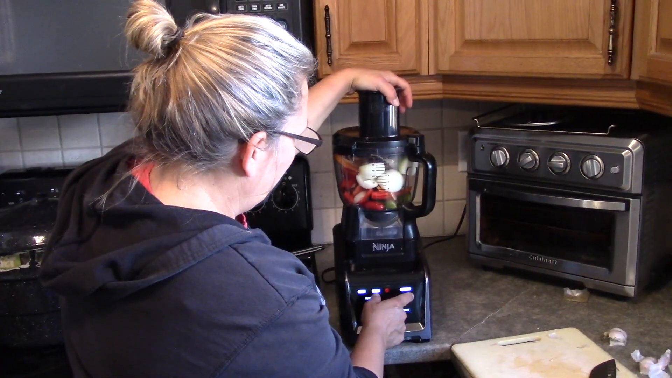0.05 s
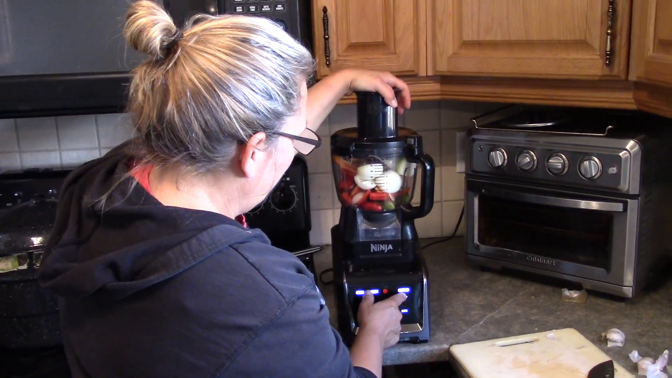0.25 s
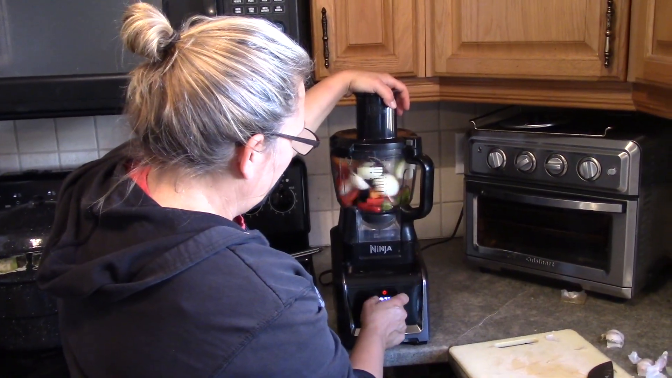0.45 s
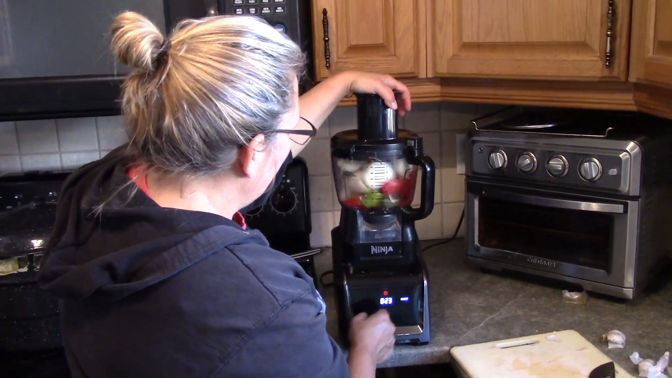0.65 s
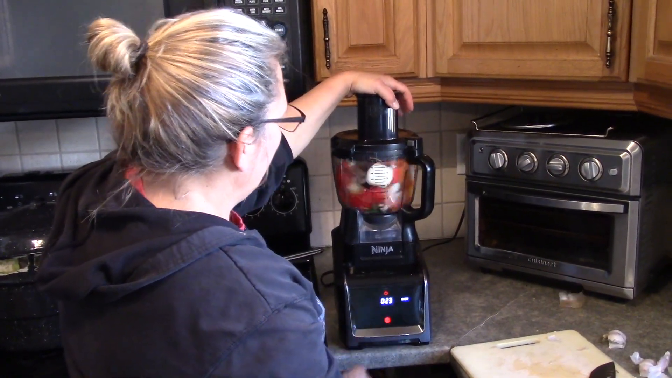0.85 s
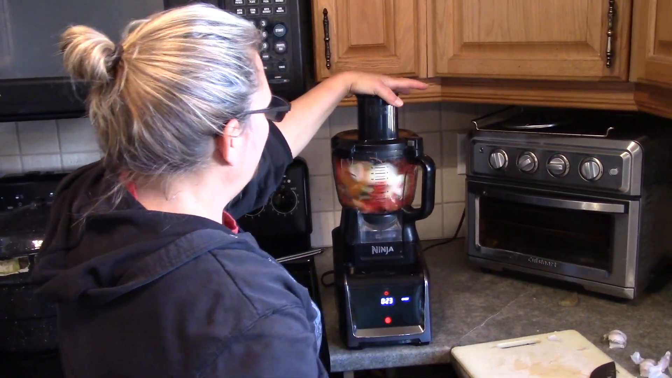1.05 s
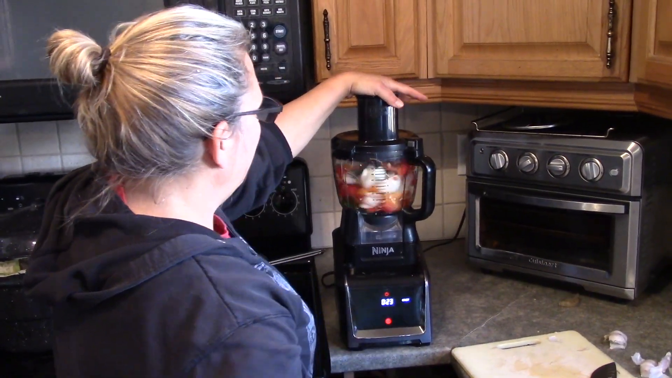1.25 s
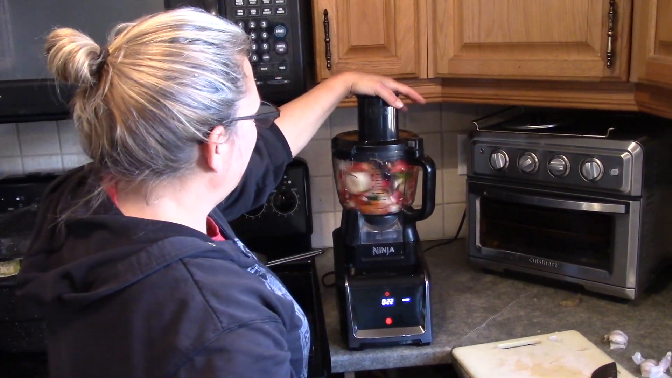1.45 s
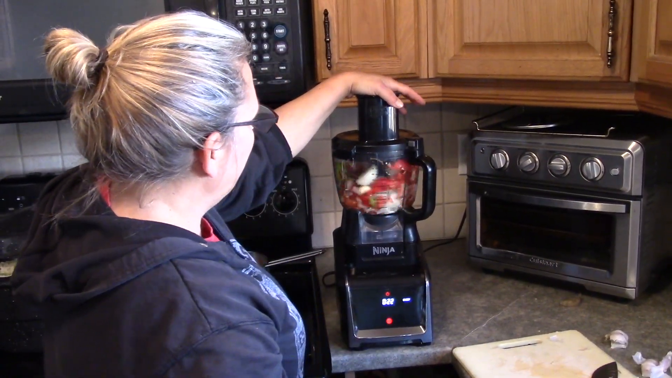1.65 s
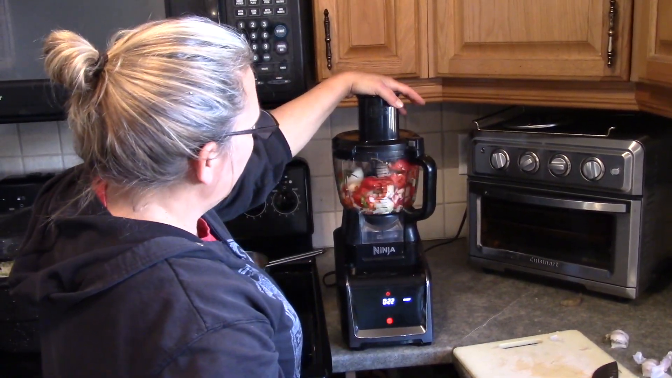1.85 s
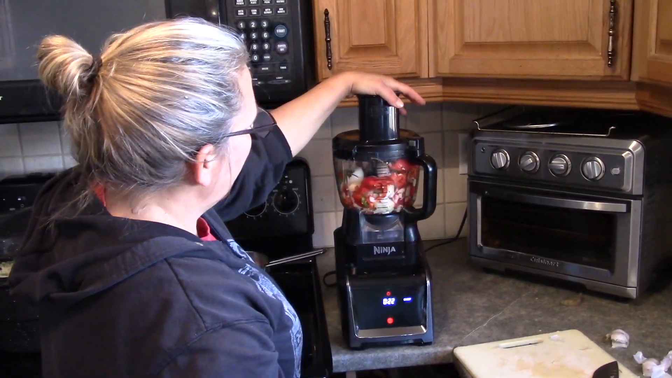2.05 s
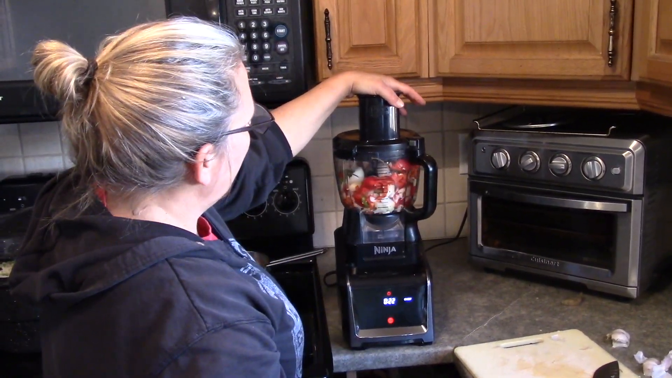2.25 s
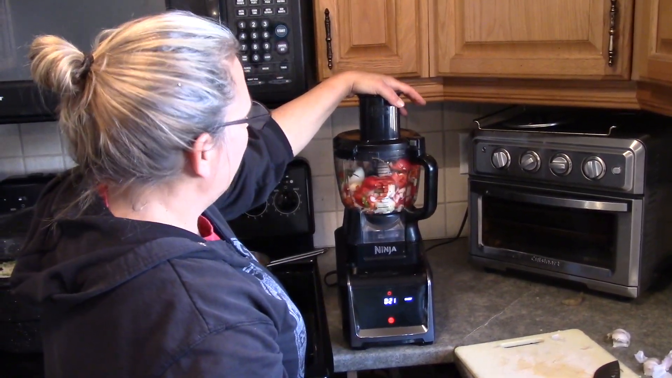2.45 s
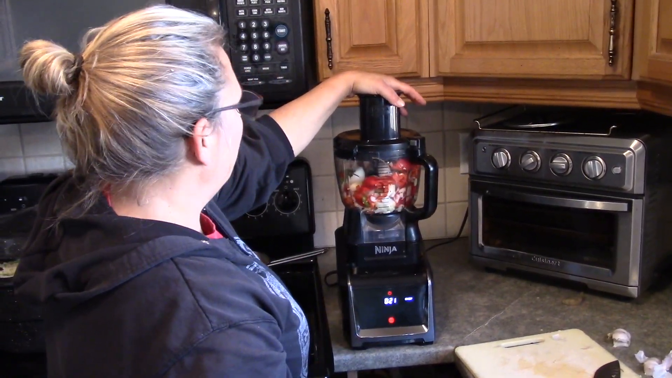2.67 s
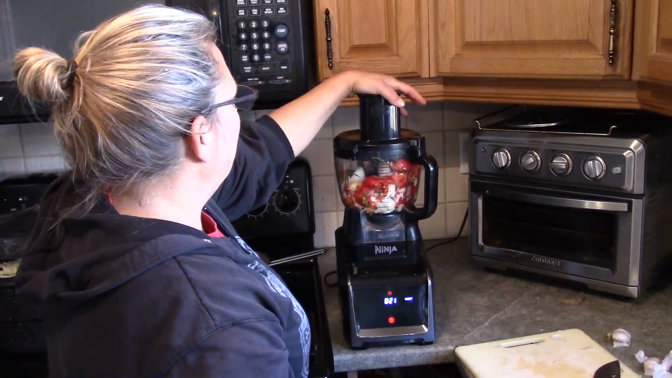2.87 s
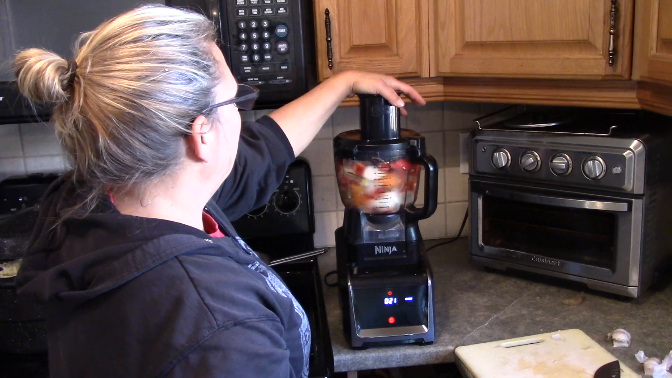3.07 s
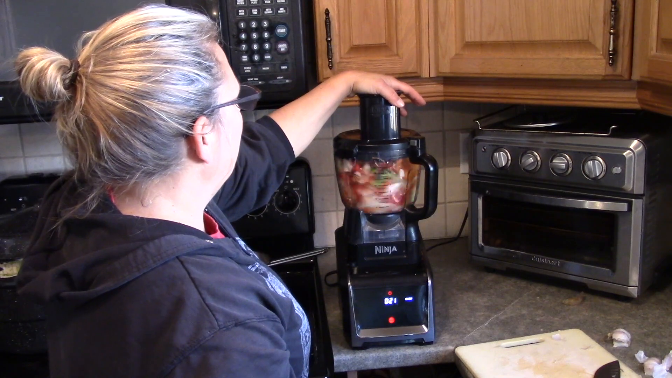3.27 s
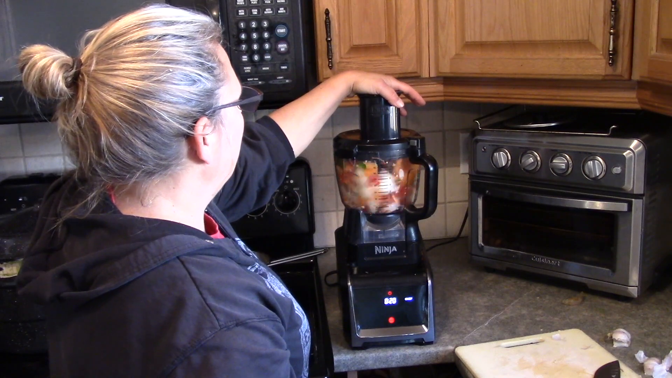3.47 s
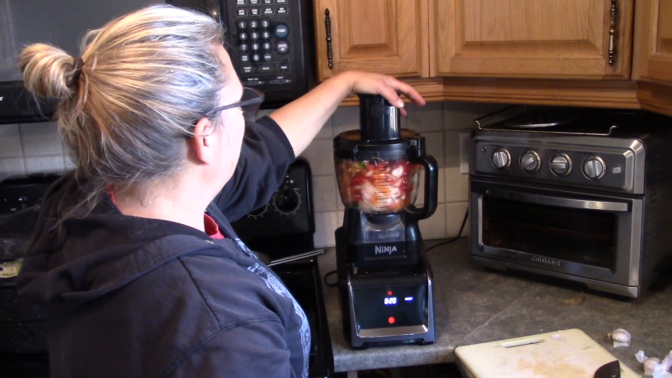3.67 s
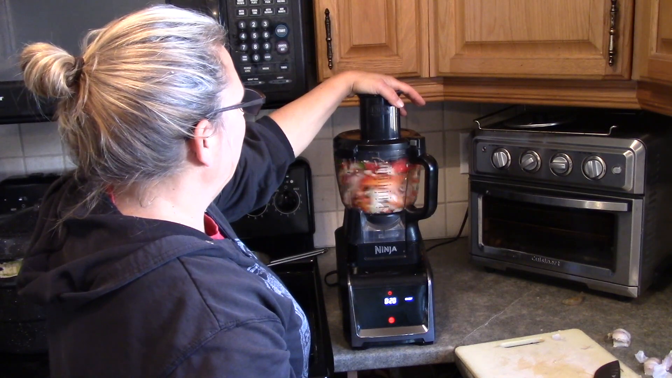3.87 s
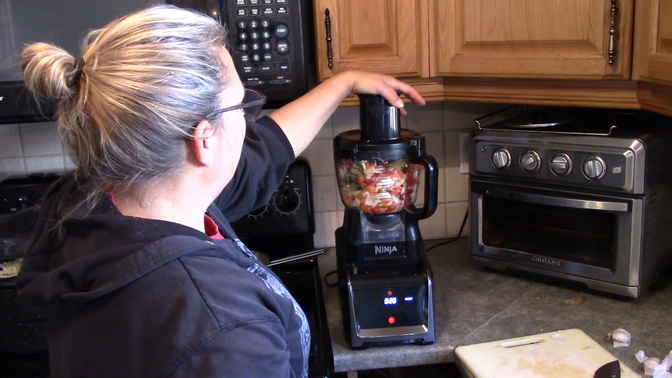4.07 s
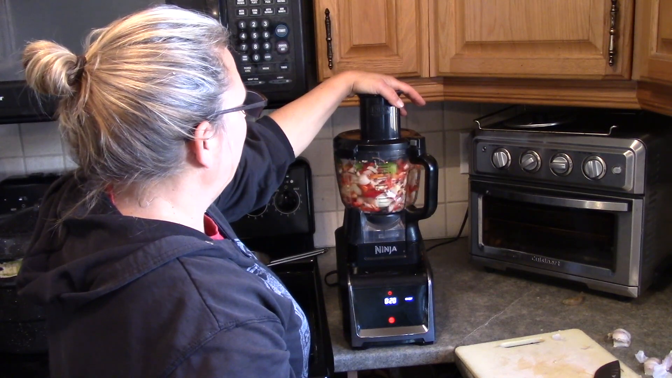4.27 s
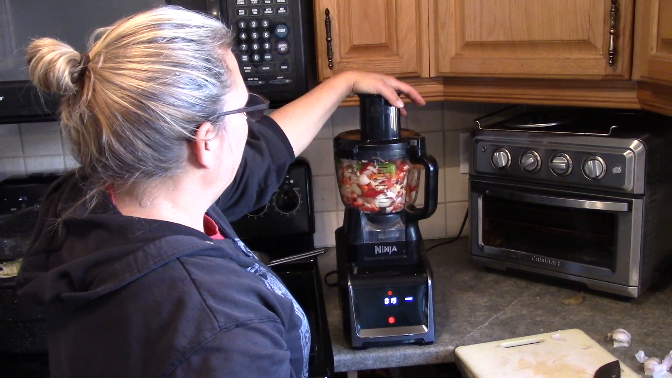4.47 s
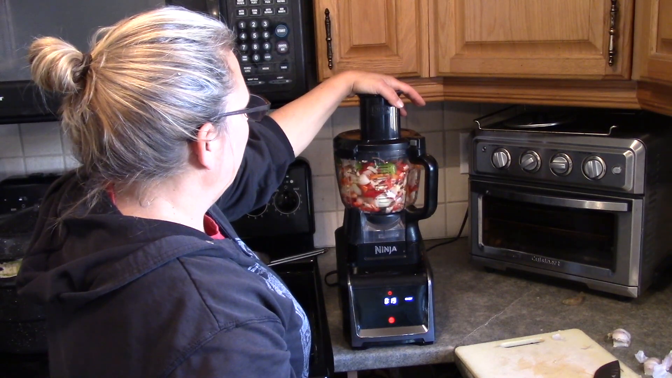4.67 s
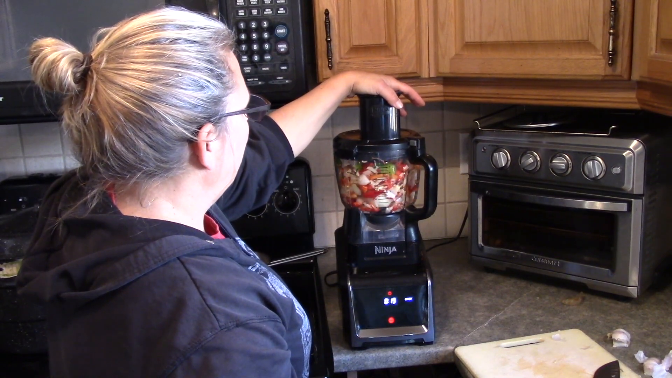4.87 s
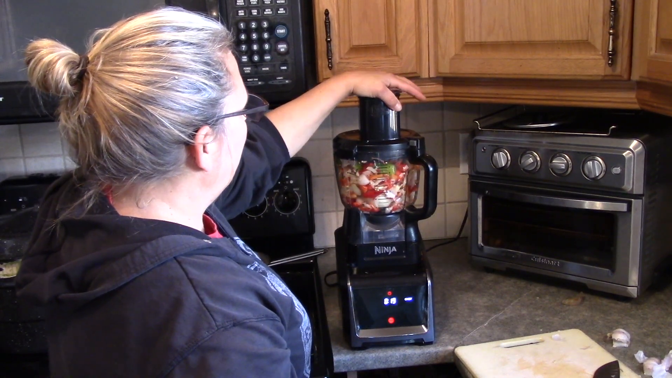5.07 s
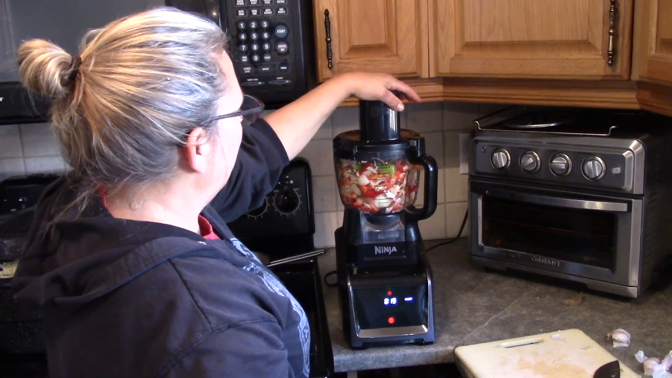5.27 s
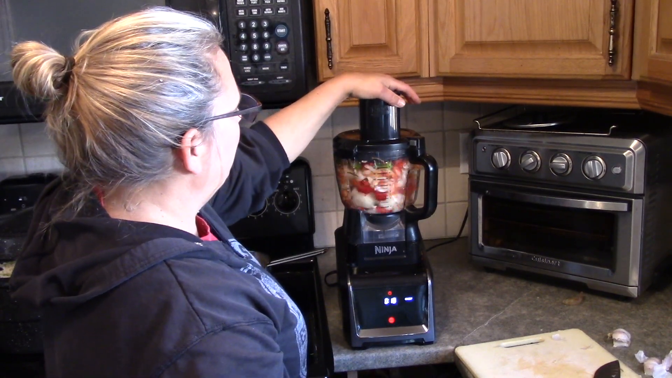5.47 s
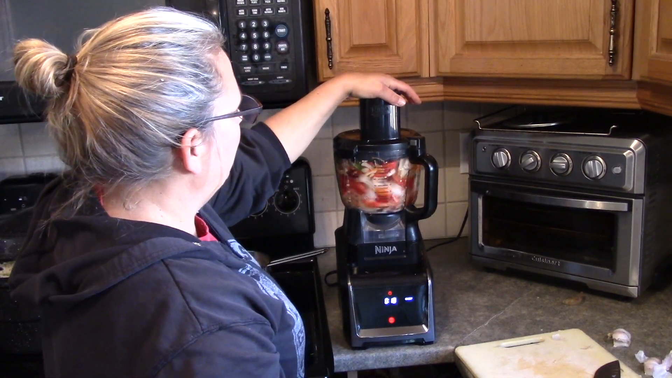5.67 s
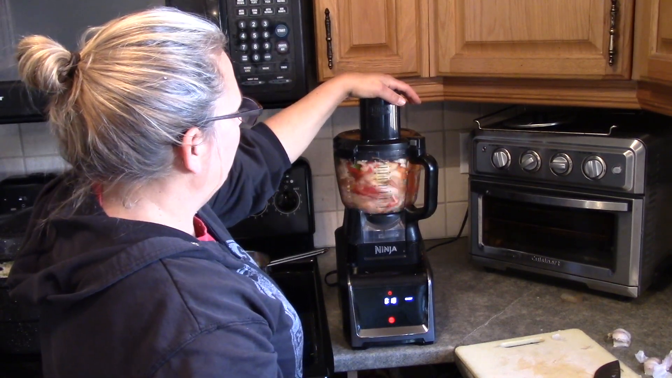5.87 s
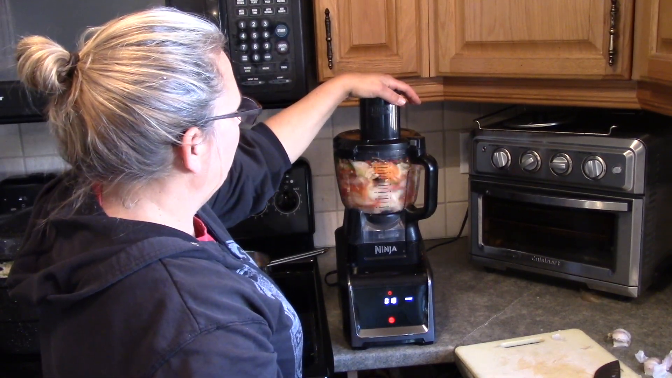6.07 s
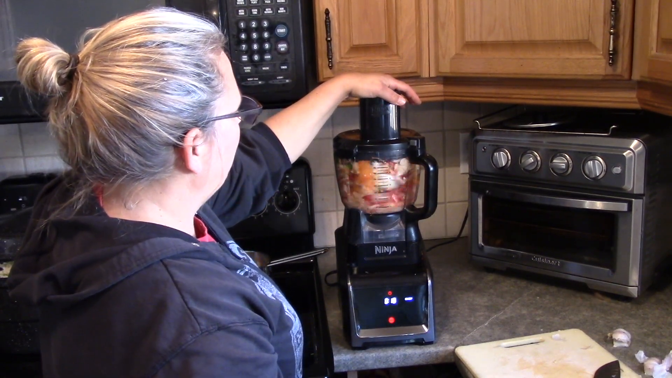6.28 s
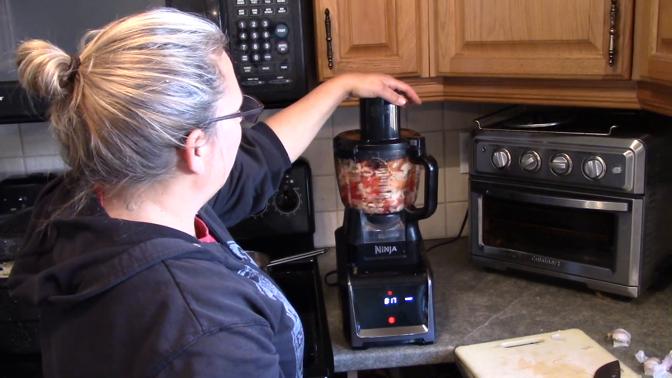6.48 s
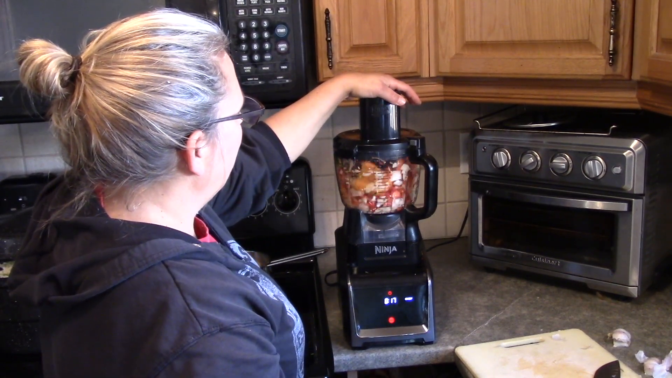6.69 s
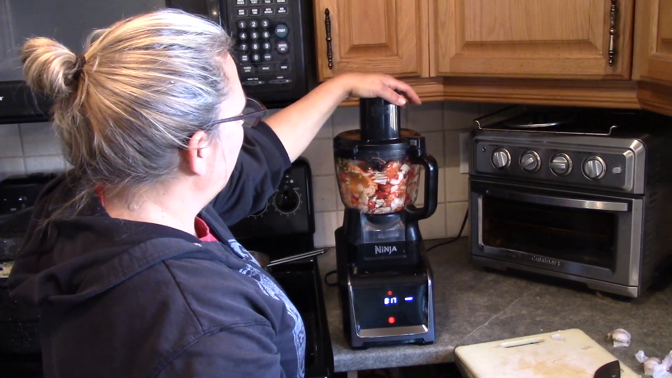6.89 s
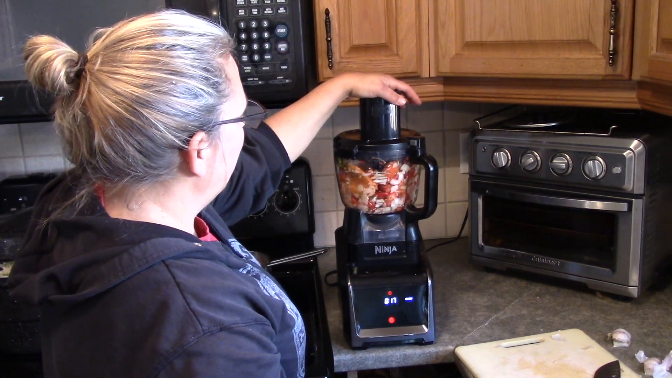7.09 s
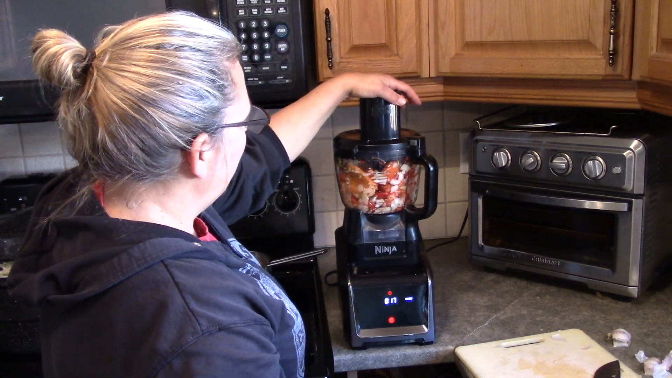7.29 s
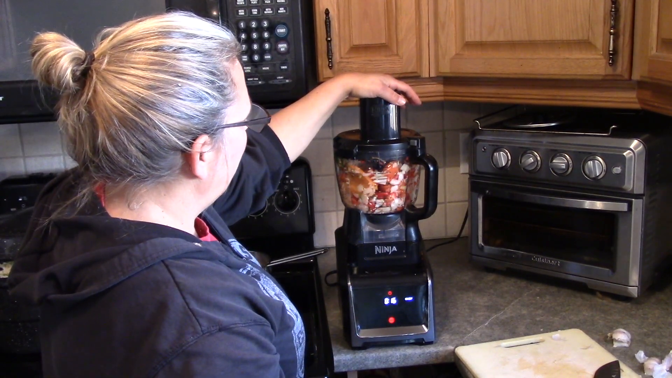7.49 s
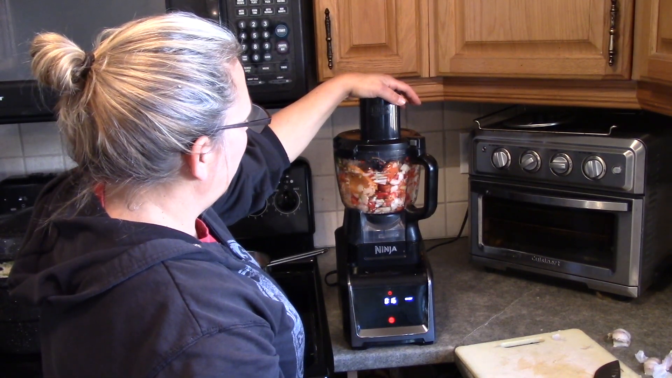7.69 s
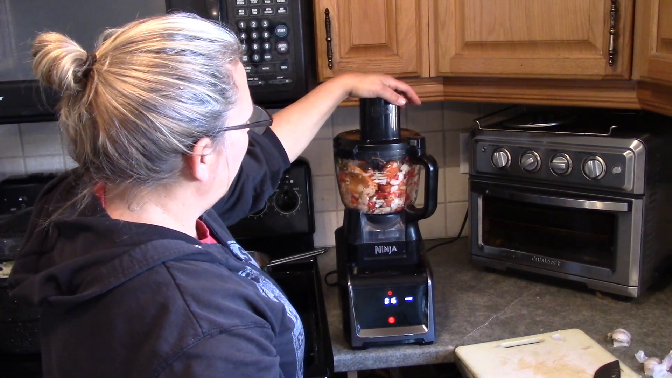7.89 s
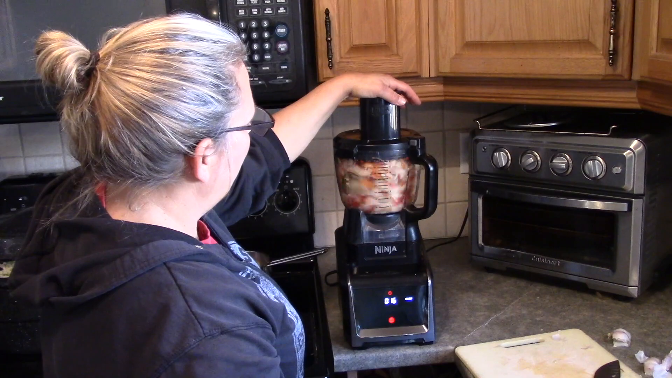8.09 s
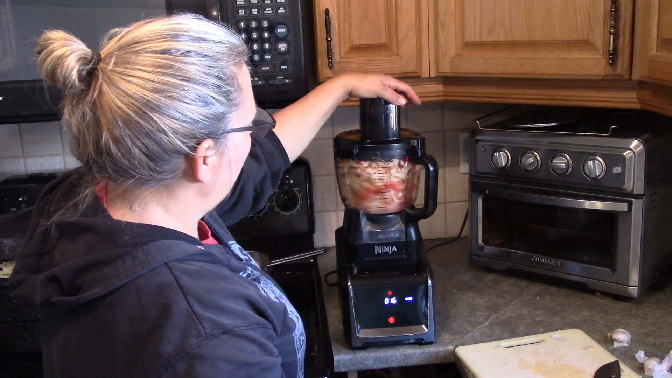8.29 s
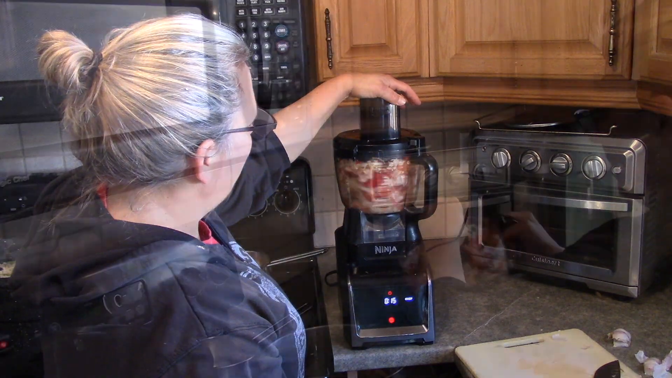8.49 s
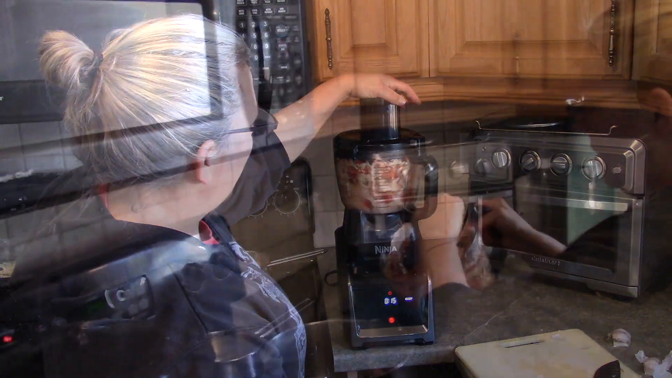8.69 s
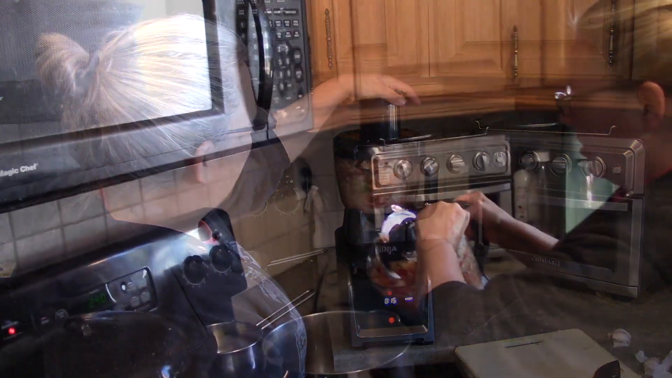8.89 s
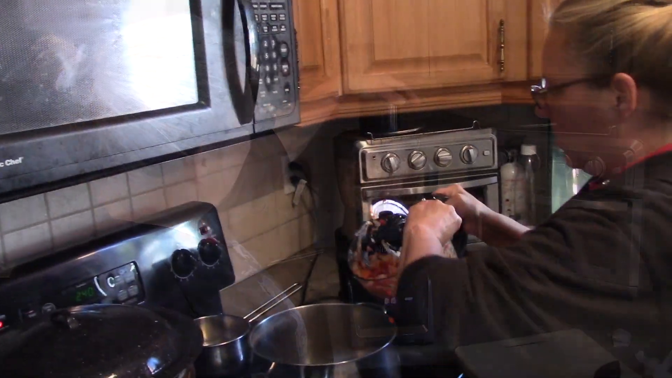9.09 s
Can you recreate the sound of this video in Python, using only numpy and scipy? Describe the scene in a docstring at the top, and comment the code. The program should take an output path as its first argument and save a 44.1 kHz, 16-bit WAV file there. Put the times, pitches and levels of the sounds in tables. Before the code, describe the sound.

A food processor chops vegetables in four loud, rattling, whirring bursts, each spinning up and winding down, with faint ticks between.

```python
"""Four whirring, rattling bursts: a food processor chops vegetables on a kitchen counter.
Each pulse opens with a snap of the blade; the motor spins up, then coasts down under drag and friction.
Its gears whine at their mesh frequency while flying pieces excite the resonances of the plastic bowl.
Relays tick and the housing knocks in the pauses, over steady air noise and a faint hum.
Gain control holds the bursts down, and the last one is faded out."""
import sys
import numpy as np
from scipy import signal
from scipy.fft import rfft, irfft
from scipy.io import wavfile
from scipy.ndimage import uniform_filter1d, map_coordinates

SR = 44100
rng = np.random.default_rng(int(sys.argv[2]) if len(sys.argv) > 2 else 0)


def unload_wav(signal):
    """Save mono or channel-first audio to the path in sys.argv[1] as 16-bit WAV at rate SR, clipped to [-1, 1]."""
    wavfile.write(
        sys.argv[1],
        SR,
        np.round(np.clip(np.atleast_2d(signal).T, -1, 1) * 32767).astype(np.int16),
    )


N = 403377
TIME = np.arange(N) / SR
POWER_S = .525  # the motor is driven this long in every pulse


def undb(db):
    """Decibels to amplitude ratio."""
    return 10 ** (np.asarray(db) / 20)


def unit(x):
    """Normalisation to rms 1."""
    return x / np.sqrt(np.mean(x ** 2))


def cut(x, hz, kind, order=2):
    """Butterworth filter."""
    return signal.sosfilt(signal.butter(order, hz, kind, fs=SR, output="sos"), x)


def add(out, start_s, x):
    """Superposition: mix x into out from start_s on."""
    i = int(start_s * SR)
    out[i:i + len(x)] += x[:len(out) - i]


def walk(rate_hz, size):
    """Smooth random modulation of rms 1, changing about rate_hz times a second."""
    points = rng.standard_normal(4096)
    return unit(map_coordinates(points, [np.arange(size) * rate_hz / SR], order=2, mode="wrap"))


def colour(x, spectrum, resonances=(), size=8192):
    """Minimum-phase filter: a smooth spectral envelope with bell-shaped peaks and dips."""
    bin_hz = np.arange(size // 2 + 1) * SR / size
    hz, db = np.transpose(spectrum)
    db = np.interp(np.log(bin_hz + 1), np.log(hz), db)
    for centre_hz, width_hz, lift_db in resonances:
        db = db + lift_db / (1 + (2 * (bin_hz - centre_hz) / width_hz) ** 2)
    cepstrum = irfft(np.log(undb(db)))
    cepstrum[1:size // 2] *= 2  # folding the cepstrum makes the response causal
    cepstrum[size // 2 + 1:] = 0
    response = irfft(np.exp(rfft(cepstrum)))
    return signal.fftconvolve(x, response)[:len(x)]


def burst(t60_s, size=16384):
    """Exponential decay of noise: the raw sound of a small blow."""
    return rng.standard_normal(size) * np.exp(-np.log(1000) * TIME[:size] / t60_s)


def scatter(hits, wet_db, t60_s):
    """Diffuse scattering: each hit lands somewhere else, so each has its own tail of echoes."""
    retention = np.exp(-2 * np.log(1000) / (t60_s * SR))
    power = signal.lfilter([1 - retention], [1, -retention], hits ** 2)
    return hits + undb(wet_db) * np.sqrt(power) * rng.standard_normal(len(hits))


def impacts(per_s, spread_db):
    """Poisson process: random hits of uneven strength, their power independent of their rate."""
    struck = rng.random(len(per_s)) < per_s / SR
    strength = undb(spread_db * np.clip(rng.standard_normal(len(per_s)), -2, 2))
    sign = rng.choice([-1, 1], len(per_s))
    return unit(struck * sign * strength / np.sqrt(per_s))


def kitchen():
    """Broadband air noise and an appliance hum that wavers by amplitude and phase modulation."""
    # spectrum of the air noise: frequency_hz, gain_db
    air_spectrum = [(18, -71), (30, -62), (65, -18), (143, -12), (195, -1.5), (296, -5.5), (320, -8.5),
                    (374, -3), (415, -9), (497, -5.5), (538, -9), (905, -14), (1520, -12), (2990, -14),
                    (9000, -34), (15000, -50.5)]
    # partials of the hum: pitch_hz, level_db
    hum_partials = [(205, -54.5), (500, -55)]
    air = unit(colour(rng.standard_normal(N), air_spectrum)) * undb(-39.5 + .63 * walk(15, N))
    hum = np.zeros(N)
    for pitch_hz, level_db in hum_partials:
        amplitude = undb(level_db + 5 * walk(16, N))
        hum += amplitude * np.sin(2 * np.pi * pitch_hz * TIME + 1.2 * walk(25, N))
    return air + hum


def relay_ticks():
    """Impulse excitation: relays and latch give bright ticks with a thin metallic resonance."""
    # relay and latch ticks: start_s, relative_peak_db
    ticks = [(0.0944, -46), (1.7833, -45), (4.3006, -34), (4.3321, -29), (6.8922, -34)]
    # spectrum of a tick: frequency_hz, gain_db
    tick_spectrum = [(500, -32), (3000, -24), (6000, 5), (9000, 12), (11000, 2), (15500, -36)]
    out = np.zeros(N)
    for start_s, relative_peak_db in ticks:
        blow = scatter(burst(t60_s=.022), wet_db=-4, t60_s=.14)
        tick = colour(blow, tick_spectrum, resonances=[(6400, 60, 17)])
        add(out, start_s, tick / np.abs(tick).max() * undb(relative_peak_db + 3))
    return out


def motor(t, coast_s):
    """Mesh frequency and torque (0-1): a first-order spin-up, then braking by drag and dry friction."""
    kick_hz, free_hz, time_constant_s = 222, 859.5, .158
    drag = .75  # drag of the food against dry friction: bends the coast-down, straight near 0
    shortfall = np.exp(-np.minimum(t, POWER_S) / time_constant_s)
    driven_hz = free_hz - (free_hz - kick_hz) * shortfall
    coast_left = np.clip(1 - (t - POWER_S) / coast_s, 0, 1)
    return driven_hz * np.tan(drag * coast_left) / np.tan(drag), shortfall * (t < POWER_S)


def reflect(x):
    """Comb filtering: early reflections from hard surfaces interfere with the direct sound."""
    # echoes off counter, tiles and cupboards: delay_ms, gain_db
    echoes = [(1.7, -20), (3.7, -19), (6.1, -19), (10.3, -17)]
    return x + sum(undb(db) * np.pad(x, (int(ms * SR / 1000), 0))[:len(x)] for ms, db in echoes)


def rattle(speed, mesh_phase, crack_db):
    """Impact noise: loose gear teeth and flying pieces excite the bowl's modes, more often at speed."""
    # spectrum of one hit on bowl and base: frequency_hz, gain_db
    bowl_spectrum = [(30, -41), (70, -26), (130, -18.5), (220, -9), (450, 1.5), (1100, 4.5), (1850, -1.5),
                     (2600, -3), (3800, -12), (5300, -14), (7000, -20.5), (9300, -21.5), (11000, -33.5),
                     (15500, -44.5)]
    # resonances of bowl, lid and base: centre_hz, width_hz, lift_db
    bowl_modes = [(214, 78, 4.5), (493, 56, 9.5), (588, 61, 5.5), (738, 48, 8), (1017, 13, 2),
                  (1363, 110, 7), (1514, 24, 9), (1965, 60, 4), (2287, 74, 6), (2657, 160, 4),
                  (2880, 29, -0.5), (3600, 22, 4.5), (4355, 59, 1.5)]
    size = len(speed)
    teeth = impacts(per_s=220 + 1900 * speed, spread_db=3.4) * (1 + .5 * np.cos(mesh_phase))
    pulp = undb(-4) * rng.standard_normal(size)  # wet pulp slides round the wall
    # slow blades shove the pieces round in clumps
    clumps = 1 + .7 * (1 - speed) ** 2 * np.cos(mesh_phase / 9 + walk(15, size))
    hits = (teeth + pulp) * clumps * undb(walk(70.83, size))
    bowl = unit(colour(scatter(hits, wet_db=2, t60_s=.53), bowl_spectrum, bowl_modes))
    body = cut(bowl, 1560, "lowpass", order=4)
    crack = reflect(cut(bowl, 1910, "highpass", order=4))
    rocking = cut(body, 263, "lowpass", order=1) * 3.75 * (1 - speed)  # slow, heavy blows rock the base
    spray = cut(crack, 6000, "highpass", order=1) * .031 * speed  # thrown by fast cuts
    return undb(2.5) * unit(body + rocking) + undb(crack_db) * unit(crack + spray)


def gear_whine(speed, mesh_phase):
    """A tone at the tooth-meshing rate, modulated by each turn and each piece the blades meet."""
    # radiation of the housing: frequency_hz, gain_db
    housing_spectrum = [(40, -40), (85, -8), (170, -7.5), (240, -3), (3000, 2)]
    # resonances and dips of the housing: centre_hz, width_hz, lift_db
    housing_modes = [(236, 49, 10), (388, 296, -10), (503, 75, 17), (711, 163, 9.5), (796, 23, -3)]
    size, teeth_per_turn = len(speed), 21.5
    jitter = (.3 + 1.2 * (1 - speed) ** 2) * walk(80, size)  # slack gears make the tone ragged
    phase = mesh_phase + jitter
    overtones = undb(-19) * np.sin(2 * phase) + undb(-14) * np.sin(3 * phase + walk(90, size))
    throb = 1 + .37 * np.cos(mesh_phase / teeth_per_turn + walk(7.84, size))
    tone = unit((np.sin(phase) + overtones) * throb * undb(1.33 * walk(58.8, size)))
    return colour(tone, housing_spectrum, housing_modes)


def blade_snap(ring_db):
    """Backlash: at switch-on the blade slaps against its drive and rings briefly."""
    # spectrum of the slap: frequency_hz, gain_db
    slap_spectrum = [(100, -25), (500, -13.5), (2500, 5), (4000, -7), (9000, -15), (11000, -26),
                     (15500, -35)]
    slap = colour(burst(t60_s=.11), slap_spectrum, resonances=[(5550, 150, ring_db)])
    return slap / np.abs(slap).max()


def chunks(t, speed):
    """Resonance: big pieces thump the wall and sound the bowl's hollow note."""
    note_hz, width_hz = 1380, 123
    bite_s = .049  # the blades need this long to get the pieces flying
    blows = impacts(per_s=180 * (.25 + speed), spread_db=2)
    note = unit(cut(blows, [note_hz - width_hz / 2, note_hz + width_hz / 2], "bandpass"))
    return note * np.sqrt(speed) * np.minimum(t / bite_s, 1) ** 2


def shaft_hum(speed, mesh_phase):
    """Rotating unbalance: a tone at the motor's turning rate that grows steeply with speed."""
    shaft_phase = .288 * mesh_phase
    return np.sin(shaft_phase) * speed ** 4 * undb(-6 + 1.3 * walk(25.3, len(speed)))


def pulse(coast_s, coast_db):
    """Forced vibration: speed and torque govern every source through one spin-up and coast-down."""
    base_hz, base_width_hz = 231, 57
    attack_s, stall_speed = .044, .17  # below this share of top speed the pieces stop flying
    t = TIME[:int(1.7 * SR)]
    mesh_hz, torque = motor(t, coast_s)
    speed, coasting = mesh_hz / mesh_hz.max(), t > POWER_S
    mesh_phase = 2 * np.pi * np.cumsum(mesh_hz) / SR
    # coasting through the base's resonance shakes the bowl
    shudder = coasting / (1 + (2 * (mesh_hz - base_hz) / base_width_hz) ** 2)
    settled = coasting * np.minimum((1 - speed) * 4, 1)  # the food drops back onto the slowing blades
    # slower hits are softer; food scrapes the shuddering wall
    crack_db = 3 + 6 * np.log2(speed + 1e-6) + 2.5 * shudder
    shaft = shaft_hum(speed, mesh_phase)
    hits = rattle(speed, mesh_phase, crack_db)
    thumps = chunks(t, speed) * undb(-6.5 + 15.5 * torque)
    gears = gear_whine(speed, mesh_phase) * undb(-1.5 - 8 * torque)  # torque presses the teeth together
    flying = speed ** 2 / (speed ** 2 + stall_speed ** 2)
    force = np.minimum(t / attack_s, 1) ** .8 * speed ** .73 * flying
    gain_db = -9.5 + 11 * torque + coast_db * settled + 2.5 * shudder
    return (hits + thumps + gears + shaft) * force * undb(gain_db)


def room(x):
    """Short, dull reverberation: the gliding whine swells and dips as it crosses the room's modes."""
    tail = burst(t60_s=.32)
    tail *= np.minimum(TIME[:len(tail)] / .01, 1)
    tail = cut(tail / np.linalg.norm(tail), 5000, "lowpass", order=1)
    return x + undb(-11.5) * signal.fftconvolve(x, tail)[:len(x)]


def housing_knocks():
    """Damped vibration: each knock on the plastic dies away in one band of frequencies."""
    # knocks of housing and lid: start_s, peak_db, centre_hz, width_hz, t60_s
    knocks = [(2.101, -32, 210, 70, 0.1), (4.697, -34, 260, 200, .1), (4.822, -27, 750, 700, 0.18),
              (4.823, -31, 3600, 4970, 0.13), (4.971, -33.5, 1100, 400, .06), (5.18, -22, 680, 480, 0.17),
              (5.199, -24, 193, 130, 0.11), (5.277, -33, 210, 79.6, 0.11)]
    out = np.zeros(N)
    for start_s, peak_db, centre_hz, width_hz, t60_s in knocks:
        blow = scatter(burst(t60_s), wet_db=-12, t60_s=.28)
        knock = cut(blow, [centre_hz - width_hz / 2, centre_hz + width_hz / 2], "bandpass")
        add(out, start_s, knock / np.abs(knock).max() * undb(peak_db))
    return out


def scene():
    """Mid-side stereo: the sources stand ahead; a faint cupboard echo and diffuse noise add width."""
    # motor pulses: start_s, coast_s, coast_db (lift while coasting), snap_db, ring_db (lift of the ring)
    pulses = [(.405, 0.9, -0.5, -3, 18.5), (2.905, .91, 3.5, -12.5, 2), (5.405, 1.0, 0.23, -9.5, 17),
              (7.905, 0.96, -1, -21, 2)]
    # room noise that differs between left and right: frequency_hz, gain_db
    diffuse_spectrum = [(25, -17), (80, -7), (200, -1), (700, -9), (1100, -19), (4000, -25), (15000, -50)]
    # cupboard echo, side relative to mid: frequency_hz, gain_db
    cupboard_spectrum = [(60, -59), (250, -27), (550, -30.5), (800, -25), (1200, -64), (4000, -38),
                         (15000, -70)]
    slack_s, cupboard_delay_s = .0024, .009
    fade_from_s, fade_s = 8.467, .73
    machine = np.zeros(N)
    for start_s, coast_s, coast_db, snap_db, ring_db in pulses:
        add(machine, start_s, pulse(coast_s, coast_db))
        add(machine, start_s + slack_s, blade_snap(ring_db) * undb(snap_db))
    fade = np.clip(1 - (TIME - fade_from_s) / fade_s, 0, 1) ** 1.23
    mid = room(machine) * fade + relay_ticks() + housing_knocks() + kitchen()
    diffuse = unit(colour(rng.standard_normal(N), diffuse_spectrum))
    side = undb(-63) * diffuse + undb(-56) * mid
    add(side, cupboard_delay_s, colour(mid, cupboard_spectrum))
    return np.array([mid + side, mid - side])


def record(dry):
    """Automatic gain control ducks at once and recovers slowly; soft clipping and band limits follow."""
    threshold_db, recovery_s, ceiling = -8, 1.87, .97
    rms = np.sqrt(uniform_filter1d(dry.mean(axis=0) ** 2, size=1200).clip(1e-12))
    recovery = TIME / recovery_s
    held_rms = np.exp(np.maximum.accumulate(np.log(rms) + recovery) - recovery)  # decaying peak hold
    ducked = dry * np.minimum(1, undb(threshold_db) / held_rms)
    rounded = ducked / (1 + np.abs(ducked / ceiling) ** 6) ** (1 / 6)
    top_cut = signal.ellip(10, .1, 80, 15800, fs=SR, output="sos")
    return signal.sosfilt(top_cut, cut(rounded, 44, "highpass", order=1))


dry = scene()
out = record(dry)
unload_wav(out)
```